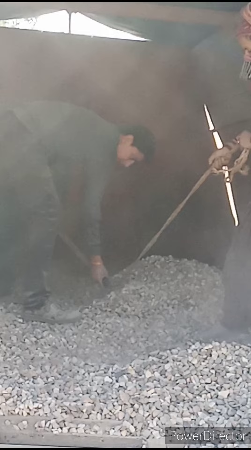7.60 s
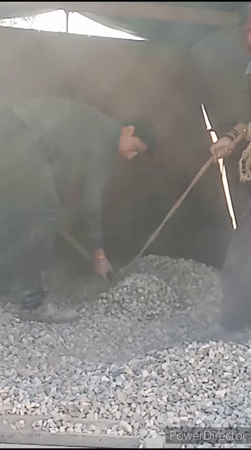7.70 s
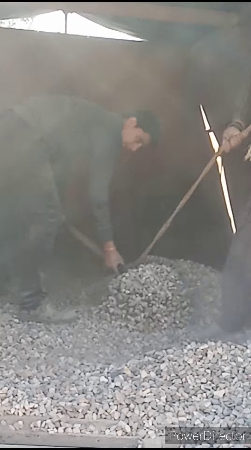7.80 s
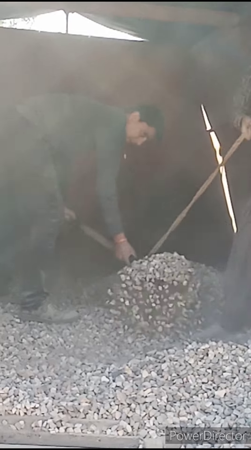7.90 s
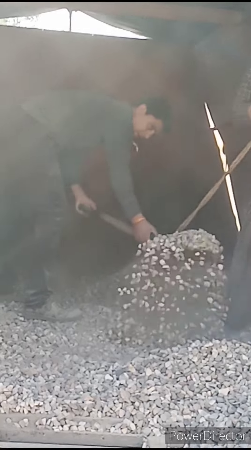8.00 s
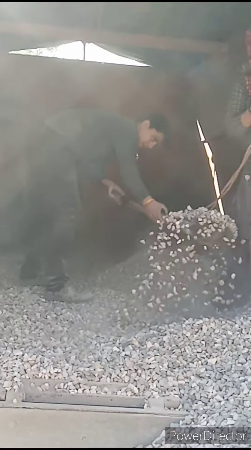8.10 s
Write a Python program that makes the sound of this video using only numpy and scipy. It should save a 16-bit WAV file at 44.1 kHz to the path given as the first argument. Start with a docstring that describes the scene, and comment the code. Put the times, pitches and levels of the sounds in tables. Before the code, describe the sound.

Inside a steel truck bed, a shovel works a heap of crushed stone. Short metallic scrapes come first, then a steady cycle: a half-second crunching thrust with hollow steel knocks, stones spilling and clinking, then a ringing upward drag. The metal floor thuds and rumbles, with close, faint wall echoes and a dull background murmur. The sound cuts out very briefly just after one second. Close, slightly dull pickup, identical in both channels.

```python
"""In a steel truck bed, two workers shovel crushed stone, one pushing the shovel, one hauling it by a rope.
About every two seconds the blade crunches into the heap: bursts of random stone touches, with steel knocking.
Then the blade is dragged up with a ringing scrape: dense random slips drive its resonances.
Between, stones spill, trickle, grind and clink (filtered touches, brief tones) and the floor rumbles and booms.
A faint dull murmur lies under it all; the sound drops out for a moment just after one second."""
import sys
import numpy as np
from scipy import signal
from scipy.io import wavfile
from scipy.ndimage import uniform_filter1d

SR = 44100
rng = np.random.default_rng(int(sys.argv[2]) if len(sys.argv) > 2 else 0)


def wrap_up_sound(samples):
    """Save the sound to the file named by the first command line argument, as 16-bit audio."""
    columns = np.atleast_2d(samples).T
    # keep every value between -1 and 1, then stretch to whole-number steps
    tamed = np.clip(columns, -1, 1)
    steps = np.round(tamed * 32767).astype(np.int16)
    wavfile.write(sys.argv[1], SR, steps)


N = 359415
T = np.arange(N) / SR

# All levels in the tables are relative: they hold before the layers are shaped and mixed.

# How loud the dull background is along the pitch scale. Each row: pitch in Hz, level in dB per Hz.
MURK_SPECTRUM = [(35, -1), (90, -9), (300, 4), (500, -2.5), (800, -2), (1500, -5.5), (3000, -7)]

# Resonances of the steel floor. Each row: pitch in Hz, width in Hz before damping, level in dB.
FLOOR_MODES = [(79.8, 9.5, -7), (108.2, 9.4, -0.5), (148, 18, -0.5), (198, 37, -4.5), (252.7, 15.5, 0.5),
               (297.6, 19.8, 0.5), (388.5, 90, -4.5)]
# Dull knocks of feet and load on the floor. Each row: start in seconds, peak level in dB.
THUMPS = [(0.019, -43), (0.626, -39), (0.808, -31.5), (1.008, -30.5), (2.845, -18.5), (2.98, -28.5),
          (3.519, -47), (4.01, -45), (4.542, -19), (4.46, -37.5), (4.948, -26), (5.538, -38),
          (6.088, -46.5), (6.618, -21.5), (6.69, -22), (7.041, -23), (7.49, -36), (7.56, -42)]

# Flow of chips trickling down the heap. Each row: time in seconds, flow level in dB.
TRICKLE = [(0.0, -51), (0.59, -47), (0.88, -47.5), (1.02, -32.5), (1.11, -52.5), (1.31, -34.5),
           (1.7, -41.5), (1.77, -30), (2.45, -47.5), (2.5, -45), (3.09, -38.5), (3.93, -32), (4.45, -50.5),
           (4.52, -37), (4.9, -37.5), (5.83, -37.5), (6.99, -40.5), (8.15, -34.5)]
# Fine grit pours off the lifted blade. Each row: start in seconds, length in seconds, level in dB.
POURS = [(0.473, 0.06, -41), (.94, 0.064, -32.5), (1.25, 0.31, -45), (1.7, .2, -31.5), (3.42, 0.2, -52),
         (3.705, 0.18, -31.5), (5.22, .4, -40), (5.682, 0.28, -32), (7.32, 0.38, -40.5),
         (7.858, 0.17, -34.5)]
POUR_ATTACK_S, POUR_FALL_DB_PER_S = 0.07, 146
# Colours of the chips and of the grit. Each row: pitch in Hz, level in dB per Hz.
CHIPS_SPECTRUM = [(2500, -22), (4000, -9.5), (5200, -5), (6400, 5.5), (8000, -1), (9600, 1.5), (11000, -12),
                  (12500, -60), (15000, -30)]
GRIT_SPECTRUM = [(7000, 4), (10000, 8), (11500, -11), (13000, -16), (14000, 0.5), (15200, 8)]
CHIPS_DB, MEAN_FLOW_DB = 2.5, -39
GRIT_DB, GRIT_FOLLOWS = -49, 0.77  # level at mean flow; share of the flow's swing

# Pinched stones grinding together. Each row: start in seconds, length in seconds, level in dB, pitch in Hz.
GRINDS = [(0.01, 0.36, -40, 4940), (0.808, .12, -42.5, 4830), (2.032, 0.049, -26, 5880),
          (3.006, 0.12, -24.5, 4910), (3.963, 0.092, -25, 6150), (5.235, 0.21, -36, 5600),
          (5.997, 0.07, -27, 6180), (7.303, 0.082, -36, 2900), (7.305, 0.083, -35.5, 5360)]
GRIND_ATTACK_S, GRIND_FALL_DB_PER_S = 0.012, 300

# Single stones that land or snap. Each row: start in seconds, peak level in dB, middle pitch in Hz.
CLINKS = [(1.285, -20, 4660), (2.4144, -26, 7380), (2.0363, -10, 6050), (2.1585, -24, 7210),
          (2.2747, -18, 9860), (3.24, -16, 6200), (3.3817, -15, 6320), (3.9469, -12, 6120),
          (4.1385, -19, 4520), (4.1654, -19, 5260), (4.2043, -23, 5350), (4.3131, -20, 9090),
          (4.3894, -21, 6910), (4.4613, -23, 6320), (4.5047, -9, 5960), (5.9668, -17, 6820),
          (6.0067, -11, 5860), (6.0382, -15, 6560), (6.1155, -17, 6630), (6.2208, -22, 8500),
          (6.2427, -20, 6510), (6.3245, -23, 8250), (6.4582, -15, 8830), (7.2993, -15, 2970)]

# The blade bites into the heap or lets go of it and rings briefly.
# Each row: start in seconds, middle pitch in Hz, peak level in dB, time in seconds to die by 60 dB.
TWANGS = [(0.615, 3370, -27, 0.25), (0.869, 1005, -33.5, 1), (2.475, 1760, -23, .12),
          (2.485, 1158, -22.5, .25), (3.476, 1480, -33.5, 0.25), (4.453, 1256, -28, 0.2),
          (5.601, 1179, -25.5, 0.53), (6.481, 1153, -28.5, 1), (7.631, 1467, -31, 0.12),
          (7.94, 796, -40.5, 0.4), (7.979, 5300, -27, 0.29)]

# Resonances of the blade: dragged flat, on its edge, flexing, and its main and upper singing modes.
# Each row: pitch in Hz, width in Hz before damping, level in dB.
BLADE_FLAT = [(2355, 30, -10.5), (2584, 116, -4), (2924, 68, 3), (3424, 125, -3.5), (3910, 69, -1),
              (4600, 120, -8.5), (4820, 50, -3.5), (5230, 126, -4.5), (5550, 65, -5), (6080, 120, -2.5),
              (6560, 52, -6.5), (7270, 130, -8.5)]
BLADE_EDGE = [(2570, 36, 6.5), (2740, 29, 7), (2865, 49, 2), (3160, 40, -1), (3380, 30, 0),
              (3660, 41, -0.5), (4260, 100, -1), (5150, 250, -7), (6000, 140, -10), (7250, 200, -9)]
BLADE_FLEX = [(1097, 81, 1), (1165, 33, 7.5), (1540, 42, -3.5)]
BLADE_MAIN = [(1790, 48, -9), (1879, 12.5, 9), (1923, 58, -6)]
BLADE_UPPER = [(2105, 20, 7), (2090, 32, -5)]
# Colour of steel rasping on stone. Each row: pitch in Hz, level in dB per Hz.
FRICTION_SPECTRUM = [(1000, -15), (1500, -8.5), (2500, -2), (3200, 2), (5000, -2.5), (6500, -5),
                     (8000, -26), (12000, -32)]
# One lighter stroke on the edge of the blade.
EDGE_START_S, EDGE_LENGTH_S, EDGE_ATTACK_S, EDGE_DB, EDGE_FALL_DB_PER_S = 0.4225, 0.16, 0.08, -25, 213
EDGE_RING_LAG_S, EDGE_RING_FALL_DB_PER_S = 0.018, 170
# The loaded blade is dragged up.
# Each row: start in seconds, length in seconds, then friction, main ring and upper ring levels in dB.
DRAGS = [(1.499, 0.21, -22.5, -25.5, -34.5), (3.539, 0.19, -24, -25, -48), (5.519, 0.24, -23.5, -29.5, -31),
         (7.684, .22, -21.5, -34.5, -30.5)]
DRAG_ATTACK_S, FRICTION_FALL_DB_PER_S, HIGH_MODES_FALL_DB_PER_S = 0.12, 292, 196
RING_ATTACK_S, RING_HOLD_S, RING_FALL_DB_PER_S = 0.08, 0.029, 256

# The blade is thrust into the heap. Each row: start in seconds, length in seconds, attack in seconds,
# then crunch, hollow knocking and floor rumble levels in dB.
THRUSTS = [(2.471, 0.55, 0.012, -23.5, -26, -33.5), (4.5, 0.47, 0.023, -22.5, -27.5, -30.5),
           (6.507, 0.55, 0.063, -24, -24, -31.5)]
# The deeper blade slows: the crunch fades and dulls, while the buried steel knocks more.
SLOWING_DB, SLOWING_POWER, BURYING_DB, BURIED_CUT_HZ = 8, 7.7, 3.5, 5740
CRUNCH_FALL_DB_PER_S, BODY_FALL_DB_PER_S = 73, 167  # body: knocking and rumble
# The heap shifts under a foot or a levered blade. Each row: start in seconds, length in seconds,
# then crunch, hollow knocking and floor rumble levels in dB.
SHIFTS = [(-.03, 0.6, -44.5, -55.5, -48), (0.593, 0.18, -41, -42, -39), (0.824, 0.17, -52.5, -44.5, -34),
          (1.071, 0.13, -41.5, -45, -56), (1.265, 0.27, -39, -46, -46), (2.022, 0.056, -41.5, -53, -55),
          (3.158, 0.41, -39, -45.5, -47), (3.973, .06, -31, -42, -51.5), (4.142, 0.061, -47, -45.5, -54),
          (4.347, 0.14, -48.5, -51.5, -58), (5.175, 0.41, -41, -48, -48.5), (5.938, 0.16, -47.5, -50, -72),
          (6.448, .1, -37, -41.5, -38), (7.188, 0.23, -41, -48, -50), (7.435, 0.13, -44, -48, -46),
          (7.593, 0.12, -37, -42, -47.5), (8.102, .05, -47.5, -44.5, -50)]
SHIFT_ATTACK_S, SHIFT_FALL_DB_PER_S = 0.03, 188
# Between strokes the heap keeps settling. One row: crunch, hollow knocking and floor rumble levels in dB.
SETTLING_DB = (-57.5, -61.5, -62)
# Colour of stones crunching. Each row: pitch in Hz, level in dB per Hz.
CRUNCH_SPECTRUM = [(900, 1.5), (1400, -3.5), (1800, 0.5), (2300, 0.5), (2900, 1.5), (3700, 1), (4800, 1.5),
                   (6000, 3.5), (7000, -3), (8000, -17), (11000, -14), (15000, -66)]
# Hollow resonances of the buried blade. Each row: pitch in Hz, width in Hz before damping, level in dB.
BURIED_MODES = [(525, 330, -4.5), (625, 66, 1), (733, 72, 3), (863, 78, -1), (1075, 69, -1), (1180, 66, 2),
                (1300, 360, -3)]

CUTOFF_HZ = 15750  # nothing much is heard above this
DROPOUT_S, RETURN_S = 1.055, 1.089
RECOVERY_S, RECOVERY_DB = 0.055, -4


def from_db(db):
    """Turns decibels into a plain gain."""
    return 10 ** (np.asarray(db) / 20)


def rms_one(x):
    """Scales a sound so that its average power is 1."""
    return x / np.sqrt(np.mean(x ** 2) + 1e-20)


def steady(x, window_s=0.06):
    """Holds the power at 1 over short stretches, leaving the fast grain."""
    power = np.abs(uniform_filter1d(x * x, int(window_s * SR)))
    return x / np.sqrt(power + 1e-12)


def band_pass(x, low_hz, high_hz, order=3):
    """Keeps the pitches between two limits."""
    band = signal.butter(order, [low_hz, min(high_hz, 0.45 * SR)], "band", fs=SR, output="sos")
    return signal.sosfilt(band, x + 1e-18)


def drift(rate):
    """Smooth chance of spread 1 that turns about rate times a second."""
    # made at one fortieth of the sample rate, after a run-in of 2000 steps
    r = np.exp(-80 * np.pi * rate / SR)
    slow = signal.lfilter([1], [1, -2 * r, r * r], rng.standard_normal(N // 40 + 2002))[2000:]
    return np.interp(np.arange(N) / 40, np.arange(len(slow)), rms_one(slow))


def bend(x, speed):
    """Plays a sound at a changing speed; its pitch follows."""
    return np.interp(np.cumsum(speed) / SR, T, x)


def stroke(start, length, attack_s, fall_db_per_s):
    """Gain of one gesture: it swells smoothly, holds to the end of its length and dies away."""
    rise = np.sin(np.pi / 2 * np.clip((T - start) / attack_s, 0, 1)) ** 2
    return rise * from_db(-fall_db_per_s * np.clip(T - start - length, 0, 2))


def contacts(per_s, spread_db):
    """Random touches of varied strength, up or down; the power does not depend on their rate."""
    chance = np.clip(per_s / SR, 1e-4, 1)
    strengths = from_db(spread_db * np.clip(rng.standard_normal(N), -2, 2))
    signed = strengths * rng.choice([-1, 1], N)
    touching = rng.random(N) < chance
    return rms_one(signed * touching / np.sqrt(chance))


def stones(clicks, spectrum, flicker_db):
    """Every stone has its own colour: each touch rings each quarter-octave band with a new strength."""
    hz, db = np.transpose(spectrum)
    edges = 16000 / 2 ** (np.arange(37) / 4)
    strengths, out = rng.standard_normal(N), 0
    for high, low in zip(edges, edges[1:]):
        if hz[0] < high and low < hz[-1]:
            centre = np.sqrt(low * high)
            band = signal.butter(2, [low, high], "band", fs=SR, output="sos")
            level_db = np.interp(np.log(centre), np.log(hz), db)
            gain = from_db(level_db + flicker_db * drift(14.0))
            own_strengths = np.roll(strengths, rng.integers(N))
            out = out + gain * signal.sosfilt(band, clicks * own_strengths + 1e-18)
    return rms_one(out)


def resonate(force, modes, damping, wander_db):
    """A body's modes ring side by side; the point of contact moves, so their shares keep changing."""
    out = 0
    for k, (hz, width, db) in enumerate(modes):
        r = np.exp(-np.pi * width * damping / SR)
        poles = [1, -2 * r * np.cos(2 * np.pi * hz / SR), r * r]
        push = force * from_db(db + wander_db * drift(3.87))
        ring = signal.lfilter([(1 - r * r) / 2, 0, (r * r - 1) / 2], poles, push + 1e-18)
        out = out + (-1) ** k * ring
    return steady(out)


def murk():
    """A faint, dull background: noise in bands whose levels flicker."""
    return from_db(-55.5) * stones(np.ones(N), MURK_SPECTRUM, flicker_db=2.7)


def steel_walls(x):
    """Close walls return a faint, dense wash of echoes."""
    t60_s, wet_db = 0.3, -12
    t = T[:SR // 2]
    noise = band_pass(rng.standard_normal(len(t)), 200, 8400, order=1)
    echoes = noise * from_db(-60 * t / t60_s) * (t > 0.004)
    wash = signal.fftconvolve(x, echoes / np.linalg.norm(echoes))[:N]
    return x + from_db(wet_db) * wash


def truck_floor(rumble_db):
    """Shoves and falling stones drum on the steel floor; a heavy knock sets its lowest modes booming."""
    drumming = resonate(contacts(500, spread_db=0), FLOOR_MODES, damping=0.73, wander_db=3.5)
    out = rms_one(band_pass(drumming, 41, 680)) * from_db(rumble_db - 2.5 + 1.3 * drift(18))
    t = T[:SR // 4]
    for s, db in THUMPS:
        boom = 0
        for hz, _, mode_db in FLOOR_MODES[:5]:
            pitch = hz * rng.uniform(0.93, 1.127)
            boom = boom + from_db(mode_db) * np.sin(2 * np.pi * (pitch * t + rng.random()))
        boom = boom * (1 - np.exp(-t / 0.0047)) * from_db(-60 * t / 0.31)
        start = int(s * SR)
        out[start:start + len(t)] += from_db(db) * boom / np.abs(boom).max()
    return out


def spill():
    """Small chips patter down the heap, with a fizz of grit among them and sparser, larger bouncing ones."""
    flow_db = np.interp(T, *np.transpose(TRICKLE))
    swing_db = flow_db - MEAN_FLOW_DB
    poured = 0
    for s, length, db in POURS:
        poured = poured + from_db(db) * stroke(s, length, POUR_ATTACK_S, POUR_FALL_DB_PER_S)
    per_s = 2600 * from_db(0.8 * swing_db)
    spread_db = 1.5
    chips = stones(contacts(per_s, spread_db), CHIPS_SPECTRUM, flicker_db=1.4)
    chips = chips * from_db(flow_db + CHIPS_DB)
    grit_gain = np.hypot(from_db(GRIT_DB + GRIT_FOLLOWS * swing_db), poured)
    grit = stones(contacts(per_s, spread_db), GRIT_SPECTRUM, flicker_db=3.0) * grit_gain
    bounces = stones(contacts(75, spread_db), CHIPS_SPECTRUM[3:7], flicker_db=1)
    return chips + grit + bounces * from_db(0.5 * flow_db - 27)


def grinds():
    """A few pinched stones chatter: random touches ring four modes around each one's shrill pitch."""
    out = 0
    for s, length, level_db, hz in GRINDS:
        modes = [(hz * ratio, 190, db) for ratio, db in [(0.8, 3), (0.93, 3.5), (1.04, 4.5), (1.2, 2)]]
        chatter = resonate(contacts(1000, spread_db=2.5), modes, damping=1, wander_db=2.5)
        gain = from_db(level_db - 1.5 + 2.1 * drift(32))
        out = out + chatter * gain * stroke(s, length, GRIND_ATTACK_S, GRIND_FALL_DB_PER_S)
    return out


def clinks():
    """A single stone: a dry crack and ten brief, unrelated modes about its pitch."""
    ring_s, crack_s, crack_db = 0.03, 0.013, -3  # times to die by 60 dB
    out, t = np.zeros(N + SR), T[:SR // 10]
    for s, db, hz in CLINKS:
        pitches = np.minimum(hz * np.exp(0.137 * rng.standard_normal((10, 1))), CUTOFF_HZ)
        tones = np.sin(2 * np.pi * (pitches * t + rng.random((10, 1)))).sum(axis=0)
        ring = rms_one(tones) * from_db(-60 * t / ring_s)
        noise = band_pass(rng.standard_normal(len(t)), 0.8 * hz, 1.5 * hz, order=2)
        crack = rms_one(noise) * from_db(-60 * t / crack_s + crack_db)
        hit, start = ring + crack, int(s * SR)
        out[start:start + len(t)] += from_db(db) * hit / np.abs(hit).max()
    return out[:N]


def twangs():
    """Five close modes of the blade start almost at once and beat as they die."""
    out, t = np.zeros(N + SR), T[:SR // 2]
    for s, hz, db, t60_s in TWANGS:
        pitches = hz * (1 + 0.023 * rng.standard_normal((5, 1)))
        ring = np.sin(2 * np.pi * (pitches * t + rng.random((5, 1)))).sum(axis=0)
        ring = ring * (1 - np.exp(-t / 0.00053)) * from_db(-60 * t / t60_s)
        start = int(s * SR)
        out[start:start + len(t)] += from_db(db) * ring / np.abs(ring).max()
    return out[:N]


def edge_drag():
    """On its edge the blade rings higher, and the ring outlasts the rasp."""
    slips = contacts(4000, spread_db=0)
    friction = stroke(EDGE_START_S, EDGE_LENGTH_S, EDGE_ATTACK_S, EDGE_FALL_DB_PER_S)
    # the ring starts later but begins to fall at the same moment
    ringing = stroke(EDGE_START_S + EDGE_RING_LAG_S, EDGE_LENGTH_S - EDGE_RING_LAG_S,
                     EDGE_ATTACK_S, EDGE_RING_FALL_DB_PER_S)
    ring = resonate(slips, BLADE_EDGE, damping=0.55, wander_db=2.0) * ringing
    rasp = stones(slips, FRICTION_SPECTRUM, flicker_db=0.5) * friction
    return from_db(EDGE_DB) * (from_db(-0.5) * ring + from_db(-1.0) * rasp)


def drags(sag_per_s=0.37, sag_span_s=0.35, waver=0.012):
    """Steel slips over stone in dense jerks: a rasp, and the blade's modes, among them its singing ones."""
    friction = lingering = main = upper = stroke_s = 0
    for s, length, friction_db, main_db, upper_db in DRAGS:
        rubbing = stroke(s, length, DRAG_ATTACK_S, FRICTION_FALL_DB_PER_S)
        slow_fall = stroke(s, length, DRAG_ATTACK_S, HIGH_MODES_FALL_DB_PER_S)
        ringing = stroke(s, length + RING_HOLD_S, RING_ATTACK_S, RING_FALL_DB_PER_S)
        friction = friction + from_db(friction_db) * rubbing
        lingering = lingering + from_db(friction_db) * slow_fall
        main = main + from_db(main_db) * ringing
        upper = upper + from_db(upper_db) * ringing
        from_middle_s = T - s - sag_span_s / 2
        stroke_s = stroke_s + from_middle_s * (np.abs(from_middle_s) < sag_span_s / 2)
    slips = contacts(4000, spread_db=1) * from_db(0.84 * drift(8.8))

    singing = main * resonate(slips, BLADE_MAIN, damping=0.72, wander_db=1.5)
    singing = singing + upper * resonate(slips, BLADE_UPPER, damping=0.72, wander_db=11.0)
    singing = band_pass(bend(singing, 1 + 0.36 * waver * drift(6.5)), 1300, 2700)

    # the flexing modes sink in pitch as the blade takes on its load
    flex = resonate(slips, BLADE_FLEX, damping=0.38, wander_db=6.5)
    flex = band_pass(bend(flex, 1 - sag_per_s * stroke_s), 1135, 1660, order=4)
    # the high modes waver with the stones on the blade
    high_modes = resonate(slips, BLADE_FLAT, damping=0.5, wander_db=4)
    high_modes = bend(high_modes, 1 + 0.5 * waver * drift(6))
    rasp = stones(slips, FRICTION_SPECTRUM, flicker_db=2.4)

    driven = friction * (from_db(-11.0) * flex + from_db(-4.0) * rasp)
    return from_db(-2.4) * singing + driven + from_db(-1.4) * lingering * high_modes


def heap_effort():
    """Adds thrusts, shifts and settling into crunch, knocking and rumble in dB, and how deep the blade is."""
    power, buried = from_db(SETTLING_DB)[:, None] ** 2, 0
    falls = np.array([[CRUNCH_FALL_DB_PER_S], [BODY_FALL_DB_PER_S], [BODY_FALL_DB_PER_S]])
    for s, length, attack_s, *levels_db in THRUSTS:
        depth = np.clip((T - s) / length, 0, 1)
        push = stroke(s, length, attack_s, falls)
        # depth changes the crunch and the knocking, not the rumble
        change_db = np.array([-SLOWING_DB * depth ** SLOWING_POWER, BURYING_DB * (depth - 1), 0 * depth])
        power = power + (from_db(levels_db)[:, None] * from_db(change_db) * push) ** 2
        buried = buried + depth * np.sqrt(push[0])
    for s, length, *levels_db in SHIFTS:
        push = stroke(s, length, SHIFT_ATTACK_S, SHIFT_FALL_DB_PER_S)
        power = power + (from_db(levels_db)[:, None] * push) ** 2
    crunch_db, knock_db, rumble_db = 10 * np.log10(power)
    return crunch_db, knock_db, rumble_db, buried


def heap(crunch_db, knock_db, buried):
    """The harder the heap is pushed, the more stones collide, in clusters; the buried blade rattles and knocks."""
    clusters_db = 1.3 * drift(35)
    per_s = 2800 * from_db(0.4 * (crunch_db + 25.5) + 2 * clusters_db)
    crunch = stones(contacts(per_s, spread_db=-4.0), CRUNCH_SPECTRUM, flicker_db=1.95)
    rattle = resonate(contacts(900, spread_db=-7.5), BLADE_FLAT[:10], damping=4.3, wander_db=2.5)
    knocks = resonate(contacts(600, spread_db=-0.5), BURIED_MODES, damping=1.0, wander_db=6.5)
    stone = (from_db(1.5) * crunch + from_db(-5.0) * rattle) * from_db(crunch_db + clusters_db)
    # the deeper the blade, the more of the muffled sound is blended in
    muffled = signal.sosfiltfilt(signal.butter(2, BURIED_CUT_HZ, fs=SR, output="sos"), stone)
    stone = stone + np.clip(buried ** 2, 0, 1) * (muffled - stone)
    return stone + rms_one(band_pass(knocks, 360, 1720)) * from_db(knock_db - 1.5)


def scene():
    """Stone, blade and floor over a dull background, the same in both channels."""
    crunch_db, knock_db, rumble_db, buried = heap_effort()
    background = murk() + truck_floor(rumble_db)
    loose_stone = steel_walls(spill() + grinds() + clinks() + heap(crunch_db, knock_db, buried))
    blade = twangs() + edge_drag() + drags()
    mono = background + blade + from_db(-1.45) * loose_stone
    return np.array([mono, mono])


def record(dry):
    """The sound drops out for a moment and fades back in; the treble has a shallow hollow, the top is cut."""
    recovery_db = RECOVERY_DB * np.clip(1 - (T - RETURN_S) / RECOVERY_S, 0, 1)
    gate_db = np.where(T < RETURN_S, -40, recovery_db) * (T > DROPOUT_S)
    hollow = 0.6 * signal.lfilter(*signal.iirpeak(13500, 7, fs=SR), dry)
    top_cut = signal.ellip(12, 0.2, 80, CUTOFF_HZ, fs=SR, output="sos")
    return signal.sosfilt(top_cut, from_db(gate_db) * (dry - hollow))


dry = scene()
out = record(dry)
wrap_up_sound(out)
```